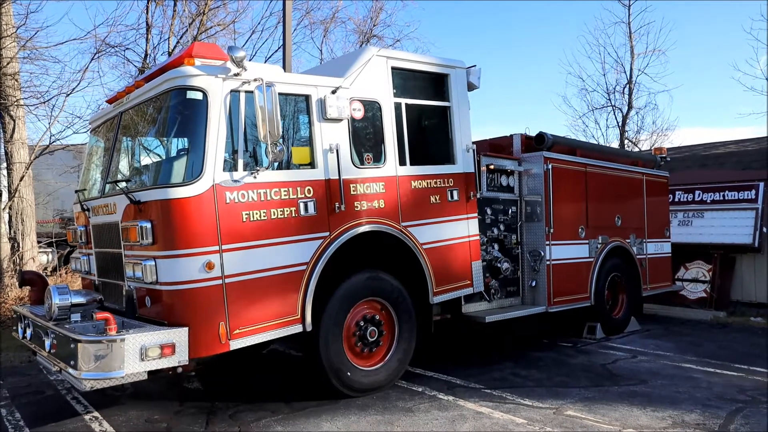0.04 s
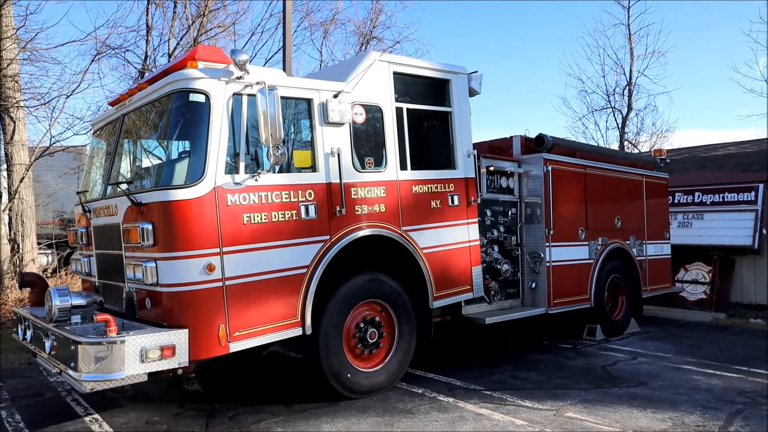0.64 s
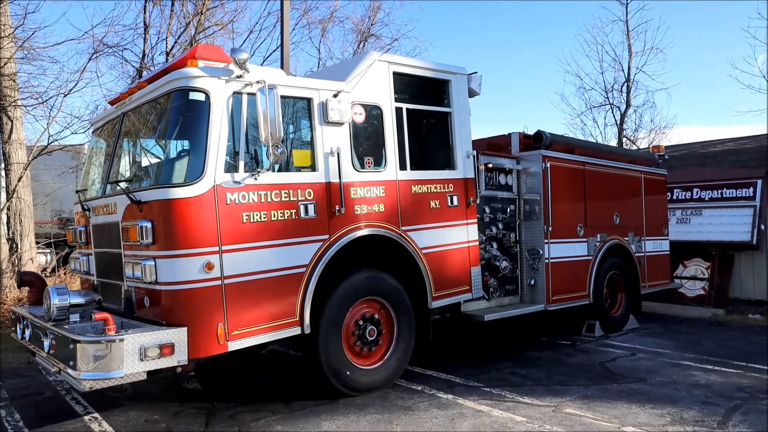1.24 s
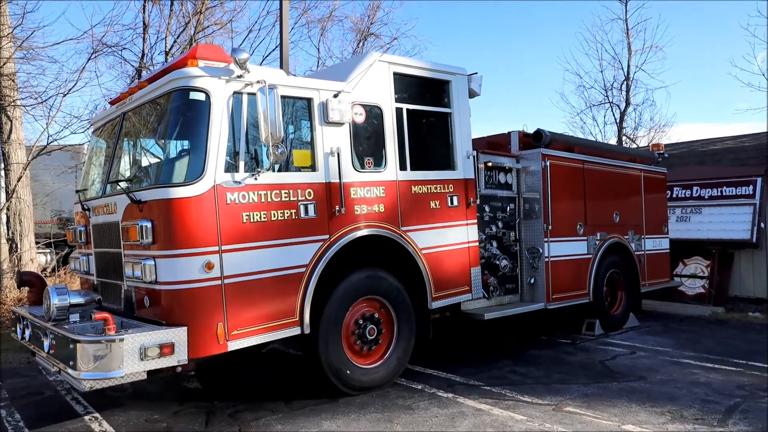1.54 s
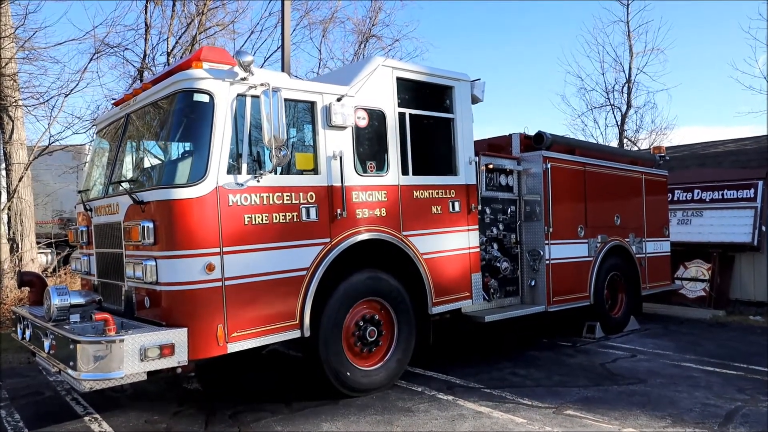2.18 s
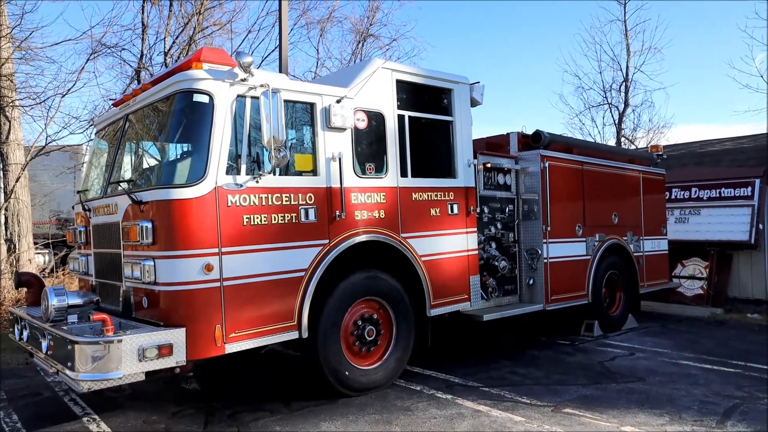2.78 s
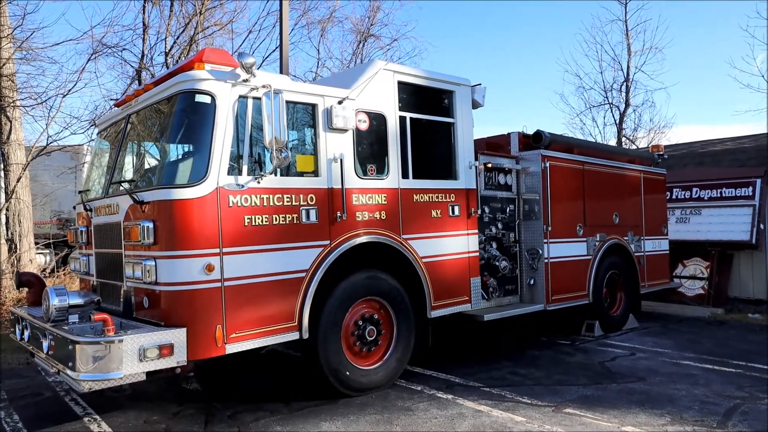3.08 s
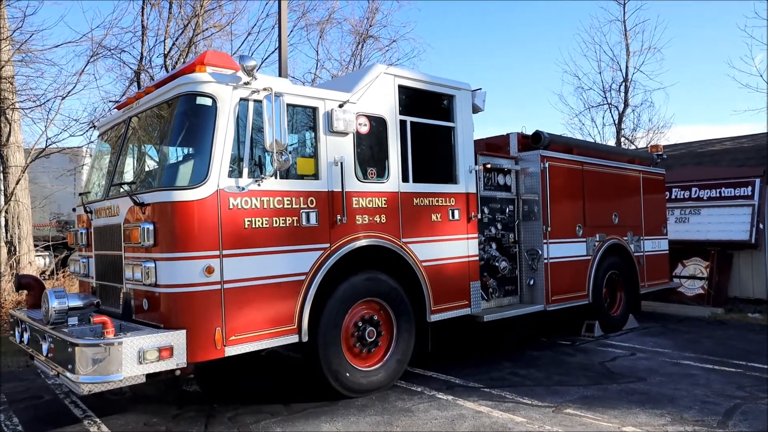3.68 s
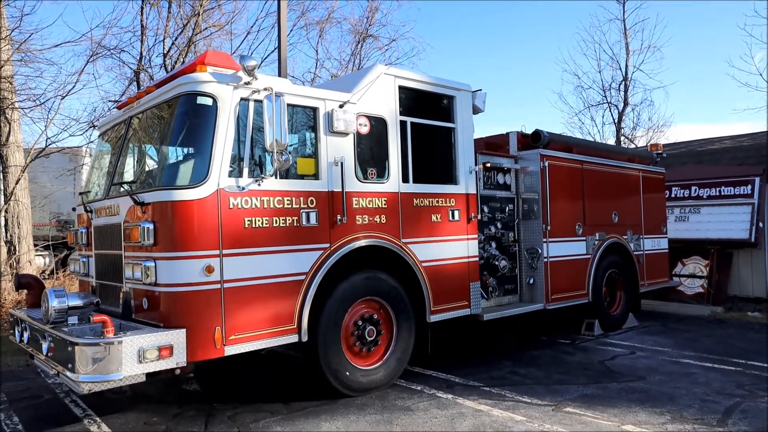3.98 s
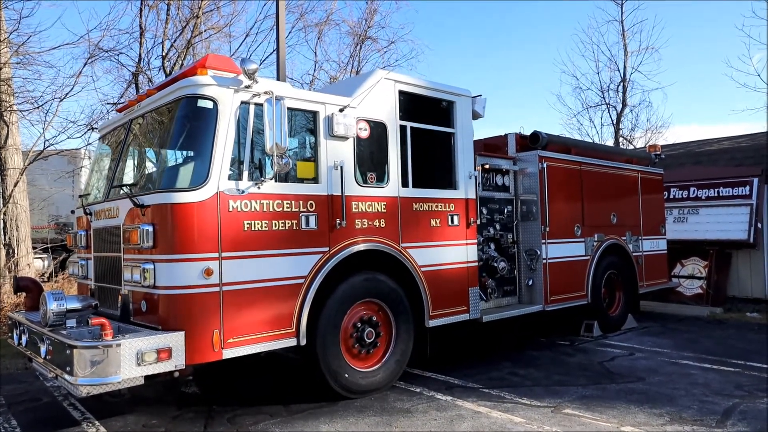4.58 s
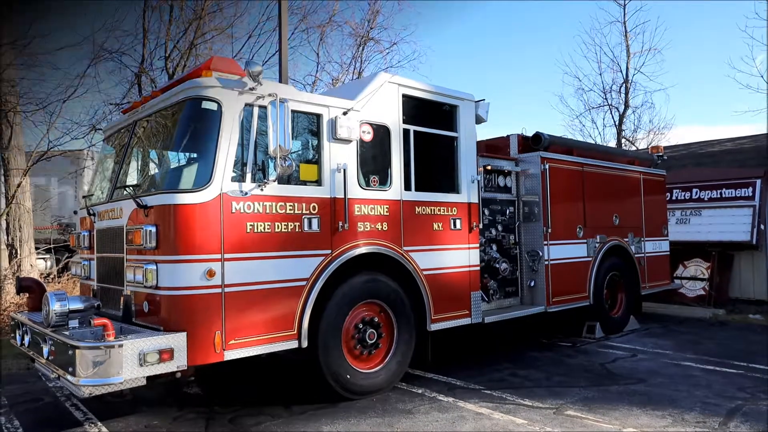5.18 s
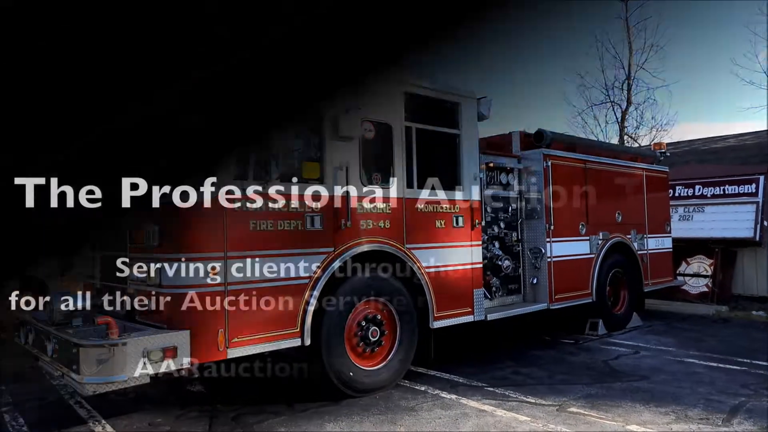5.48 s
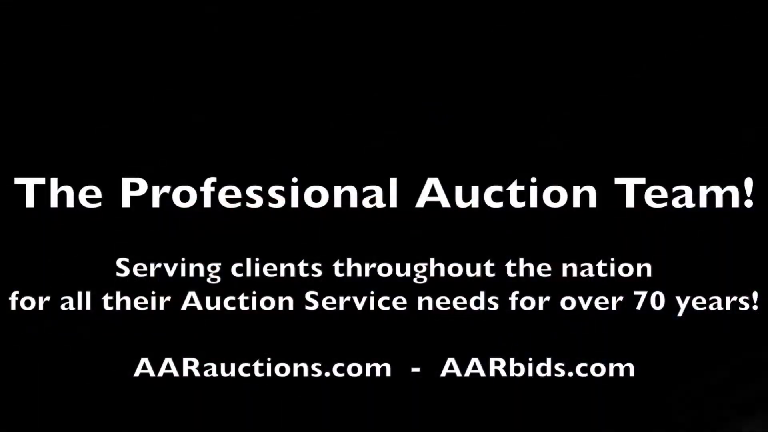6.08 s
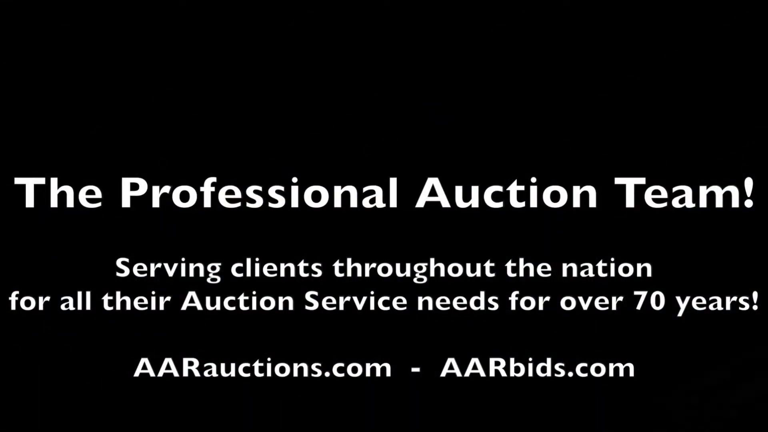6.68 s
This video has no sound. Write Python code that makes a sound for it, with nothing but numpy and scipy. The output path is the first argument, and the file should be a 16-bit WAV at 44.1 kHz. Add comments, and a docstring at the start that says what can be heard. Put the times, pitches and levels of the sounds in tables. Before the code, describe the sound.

A parked fire truck idles nearby, its diesel engine knocking and rattling evenly, with puffs of wind on the microphone.

```python
"""In a parking lot, a fire engine's six-cylinder diesel idles a few metres away.
Each firing and its piston strikes knock the engine block and body panels. The valve gear
clatters, the exhaust drones, and a faint whistle climbs over a hiss of air.
Gusts buffet the microphone's openings and a few small metal parts tick, until the sound
is switched off."""
import sys
import numpy as np
from scipy import signal
from scipy.fft import rfft, irfft, next_fast_len
from scipy.io import wavfile
from scipy.ndimage import map_coordinates

SR = 44100
rng = np.random.default_rng(int(sys.argv[2]) if len(sys.argv) > 2 else 0)


def output_pcm(signal):
    """Save a mono or channel-first signal as 16-bit PCM at the path in sys.argv[1].

    Samples are clipped to [-1, 1] before scaling.
    """
    pcm = np.clip(np.atleast_2d(signal).T, -1, 1) * 32767
    wavfile.write(sys.argv[1], SR, np.round(pcm).astype(np.int16))


N = 301423

# strength of each cylinder, in firing order: (level [dB])
CYLINDER_DB = [-.2, 0, .4, 0, -.4, .3]
# how loud the engine sounds, dipping briefly after the wind slap near 4 s:
# (time [s], knock [dB], clatter [dB])
ENGINE_LEVELS = [(0, -18.5, -33), (1.1, -19.5, -34), (3.85, -19.5, -34), (4.1, -20.5, -35.5),
                 (4.9, -19.5, -34.5), (6.1, -19, -33)]
# each piston strikes three times after it fires: (delay [s], level [dB])
PISTON_STRIKES = [(.0075, -1), (.0135, 0), (.02, -3)]
# knocks that stand out: (time [s], level over an ordinary strike [dB])
HARD_KNOCKS = [(.113, 11.5), (.334, 7), (.565, 10.5), (1.419, 8.5), (1.609, 12), (1.763, 8), (1.799, 8),
               (2.371, 10.5), (4.848, 5), (5.545, 5)]
# how much of the rattle repeats every engine cycle: (frequency [Hz], share [0-1])
REPEATING_SHARE = [(100, .3), (300, .35), (550, .7), (850, .8), (1200, .68), (1700, .48), (2500, .22),
                   (5000, .08)]
# the tone of each source, from low to high: (frequency [Hz], relative level [dB])
BLOCK_SPECTRUM = [(300, -46), (520, -11.5), (640, -7), (730, -3), (1150, -0.5), (1480, -5.5), (1750, -5.5),
                  (2100, -7.5), (2600, -11.5), (3000, -22.5), (4000, -49), (6000, -58)]
VALVE_SPECTRUM = [(1500, -35.5), (2600, -0.5), (3300, 3.5), (4100, 2), (4500, -3), (5100, -7.5),
                  (5600, -4.5), (6300, -6.5), (7200, -20.5), (9000, -22), (12000, -31), (16000, -35)]
EXHAUST_SPECTRUM = [(25, -34), (50, -28), (80, -14), (120, -5), (170, -.5), (260, 0), (340, -3), (450, -1),
                    (570, 1), (700, -8), (1000, -30)]
BUFFET_SPECTRUM = [(20, -39), (45, -38), (70, -27), (100, -18), (150, -1), (250, 5), (400, 1.5),
                   (600, -2.5), (1000, -27), (2500, -56)]
RUMBLE_SPECTRUM = [(20, -19.5), (45, -21), (70, -4.5), (100, 0), (140, 8.5), (250, -37.5)]
HISS_SPECTRUM = [(2000, -8), (6000, 8.5), (9000, -1.5), (12000, -1), (15500, -8.5)]
# steady exhaust tones: (pitch [times the firing rate], level [dB])
EXHAUST_TONES = [(2, -66.5), (3, -55), (4, -51), (6, -54), (12, -49), (18, -49)]
# ringing panels and covers, and the dips between them: (pitch [Hz], width [Hz], boost [dB])
PANEL_RINGS = [(447, 22, 3), (510, 25, -2), (566, 20, 4), (642, 40, -3.5), (706, 25, 3), (778, 28, 6),
               (828, 14, 3), (855, 20, 5), (907, 24, -4.5), (953, 20, 5), (1003, 32, 4.5), (1038, 22, 2.5),
               (1118, 20, 2), (1174, 36, 4.5), (1262, 28, -3), (1296, 25, 2), (1366, 22, 5.5),
               (1448, 16, 2), (1602, 20, 2.5), (1640, 30, 3), (1762, 30, 2), (2130, 40, -2.5),
               (2390, 40, 3.5), (2800, 50, 2), (3230, 90, 2.5), (5940, 90, 5)]
# panels whose ring comes and goes: (pitch [Hz], width [Hz])
LOOSE_PANELS = [(778, 35), (953, 30), (1005, 50), (1118, 30), (1180, 55), (1366, 35)]
# how freely they ring: (time [s], then one boost for each of the six panels [dB])
LOOSE_PANEL_BOOSTS = [(0, -1, .8, -2, 1.5, -1.3, 2), (.6, -1, 1.3, -1.7, 2, -1.3, 1.5),
                      (1.3, -1, 1.3, -1, .7, -2.5, 1), (1.8, .3, .2, .3, -.5, -.5, 2.2),
                      (2.8, .5, -2, -1, -1, 1, -2), (3.7, .5, -2, .6, -1, 1.5, -2),
                      (4.3, -.5, -2.5, .7, -2, 1, -3), (5.2, -.3, -2.5, .7, -1.5, -1.5, -2.5),
                      (6, .5, -1.3, 1.5, -1.5, 0, -2)]
# how alike the engine sounds at the two ears: (frequency [Hz], likeness [0-1])
ENGINE_LIKENESS = [(60, .93), (130, .92), (290, .9), (640, .96), (1250, .95), (2300, 0.62), (3100, 0.45),
                   (6000, 0.3), (9000, 0.35), (15000, .2)]
# how much louder it is on the left: (frequency [Hz], left minus right [dB])
ENGINE_BALANCE = [(60, -1.5), (110, -2), (200, -3.5), (380, 1.5), (700, -0.5), (1290, -2), (2380, -3.5),
                  (4400, 1), (8120, 2.0), (15000, 3.0)]
# how far its waves are ahead on the left: (frequency [Hz], phase lead [radians])
ENGINE_LEAD = [(0, 2.5), (260, -0.16), (950, 0.0), (2410, 0.07), (3010, 2), (3960, 2.0), (5170, 4),
               (6890, 3.5), (8960, 1), (9300, 3), (10500, 4), (12400, 5), (13400, 3.5), (15600, 4)]
# a light breeze with three lulls: (time [s], level [dB])
BREEZE_LEVELS = [(0, -31.5), (2.1, -30), (2.45, -39.5), (2.8, -29), (4.15, -39), (4.4, -30), (5.6, -32),
                 (5.9, -35), (6.15, -28)]
# gusts: (start [s], hold [s], buffet [dB], rumble [dB], left minus right [dB])
GUSTS = [(0.028, 0.079, -24, -36.5, 0), (0.22, 0.085, -32, -35.5, 4), (0.588, 0.19, -28, -34, 8),
         (1.24, 0.099, -26, -56, 3.5), (1.459, 0.066, -29, -60.5, 5), (1.71, 0.15, -31, -52, 4),
         (2.07, 0.068, -29, -42, 4.5), (2.538, 0.13, -19, -46, 2.5), (2.722, 0.13, -21, -37, 1),
         (2.925, 0.12, -27.5, -55.5, 1.5), (3.202, 0.17, -23, -47, 2), (3.46, 0.069, -25.5, -46, 4),
         (3.816, 0.14, -24, -42, 7), (4.46, 0.091, -30, -42, 7), (4.855, 0.17, -28.5, -62, 1.5),
         (5.27, .14, -34, -40.5, -3.5), (5.672, 0.098, -27, -42.5, 3), (6.018, 0.096, -29.5, -49, 8)]
# slaps of wind: (start [s], level [dB], left minus right [dB], low edge [Hz], high edge [Hz])
WIND_SLAPS = [(0.682, -17, 10.5, 110, 480), (0.919, -18.5, 7, 160, 450), (1.27, -22, 6, 220, 520),
              (2.565, -20, 9, 151, 450), (2.62, -20.5, 5.5, 170, 500), (2.652, -22, 0.5, 159, 418),
              (2.745, -23, 4, 90, 260), (2.79, -22, 8, 280.5, 600), (3.308, -20.5, -0.5, 130, 290),
              (3.986, -12.5, 8, 234, 580), (4.505, -23.5, 5, 100, 220), (4.798, -22, 5.5, 240, 620),
              (5.043, -24, 2, 273, 460), (5.72, -25, 5, 90, 200), (5.758, -17.5, 7, 120, 400)]
# how alike the wind is at the two openings: (frequency [Hz], likeness [0-1])
WIND_LIKENESS = [(50, .85), (160, .92), (400, .88), (700, .6)]
# how far the wind is ahead on the left: (frequency [Hz], phase lead [radians])
WIND_LEAD = [(40, .1), (90, .45), (160, .9), (260, 1.2), (400, 1.35), (700, 1.3)]
# small metal ticks: (start [s], level [dB], pitch [Hz], width [Hz], time to fade by 60 dB [s])
METAL_TICKS = [(.1765, -36.5, 5520, 600, .05), (.49, -36.5, 5550, 600, .05), (2.338, -37, 5550, 600, .06),
               (2.395, -34, 5900, 450, .06), (3.32, -38, 5890, 400, .06), (3.41, -36, 6000, 600, .07),
               (3.918, -36, 5940, 450, .08), (3.983, -35.5, 5800, 550, .07), (4.3, -36.5, 5970, 450, .07),
               (4.818, -46.5, 10320, 200, .14), (4.812, -45, 10500, 4400, .12),
               (5.19, -35.5, 5500, 1500, .06), (5.764, -37, 5600, 2000, .19),
               (5.792, -19.5, 4750, 2400, .011), (5.796, -37, 5900, 600, .07),
               (5.826, -35, 5200, 1700, .08)]
# swells of the whistle: (time [s], boost [dB])
WHISTLE_SWELLS = [(.62, 12), (4.52, 9)]

FIRING_HZ = 31.502  # firings per second, all cylinders together
TIME = np.arange(N) / SR  # seconds


def engine():
    """Knock, valve clatter and exhaust all keep time with the turning crankshaft."""
    firings = crank()
    knock_gain, clatter_gain = amp(curves(ENGINE_LEVELS))
    return knock_gain * knock(firings) + clatter_gain * valve_clatter(firings) + exhaust(firings)


def crank(hunt=.0061, flutter=.00086):
    """A running count of firings; the governor, which holds the speed, wavers very slightly."""
    return .7 + FIRING_HZ * TIME + hunt * wobble(2.5) + flutter * wobble(14)


def knock(firings, strike_share=.08):
    """Burning fuel and striking pistons shake the block and its panels."""
    bangs = pulses(firings, rise_s=.0062, decay_s=.02, floor=.39, scatter_db=.6)
    combustion = unit(rattle(firings) * bangs)
    strikes = unit(bending_waves(piston_strikes(firings)))
    force = np.sqrt(1 - strike_share) * combustion + np.sqrt(strike_share) * strikes
    return loose_panels(radiated(force, BLOCK_SPECTRUM))


def piston_strikes(firings, offset_s=.0012, jitter_s=.00007, scatter_db=2):
    """Sharp piston strikes, each cylinder with its own timing, and a few harder knocks."""
    number = np.arange(1, int(firings[-1]))
    delay, db = np.transpose(PISTON_STRIKES)
    offsets = offset_s * rng.standard_normal((len(CYLINDER_DB), len(delay)))
    jitter, scatter = rng.standard_normal((2, len(number), len(delay)))
    fired_s = np.interp(number, firings, TIME)
    strike_s = fired_s[:, None] + delay + offsets[number % len(CYLINDER_DB)] + jitter_s * jitter
    hard_s, hard_db = np.transpose(HARD_KNOCKS)
    samples = np.round(np.append(strike_s, hard_s) * SR).astype(int)
    sizes = amp(np.append(db + scatter_db * scatter, hard_db))
    random_sizes = sizes * rng.standard_normal(len(sizes))
    return np.array([np.bincount(samples, weights, N)[:N] for weights in (sizes, random_sizes)])


def bending_waves(x, travel_s=.005, at_hz=1000):
    """High notes cross the block sooner than low ones, so a strike becomes a short falling chirp."""
    return filtered(x, lambda hz: np.exp(-2j * np.pi * travel_s * (2 * np.sqrt(at_hz * hz) - hz)))


def loose_panels(x):
    """The loudest panels ring now more, now less freely."""
    out = x
    for (pitch, width), db in zip(LOOSE_PANELS, curves(LOOSE_PANEL_BOOSTS)):
        ring = filtered(x, lambda hz: 1j * hz * width / (pitch ** 2 - hz ** 2 + 1j * hz * width))
        out = out + (amp(db) - 1) * ring
    return out


def valve_clatter(firings):
    """The valve gear taps, a little louder once per turn of the crank (three firings)."""
    turn_db = .8 * np.cos(2 * np.pi * (firings - 2.4) / 3)
    taps = amp(turn_db) * pulses(firings, rise_s=.005, decay_s=.02, floor=.48, scatter_db=1.1)
    return radiated(rattle(firings) * taps, VALVE_SPECTRUM)


def exhaust(firings):
    """One uneven puff per firing, over a drone at multiples of the firing rate."""
    puffs = pulses(firings, rise_s=.008, decay_s=.028, floor=.32, scatter_db=4)
    chugging = amp(-33.5) * radiated(rattle(firings) * puffs, EXHAUST_SPECTRUM)
    drone = sum(amp(db) * tone(multiple * firings + rng.random()) for multiple, db in EXHAUST_TONES)
    return chugging + drone


def pulses(firings, rise_s, decay_s, floor, scatter_db):
    """A loudness curve: each firing swells and dies away over a steady floor."""
    index = firings.astype(int)
    count = index.max() + 2
    size = amp(np.resize(CYLINDER_DB, count) + scatter_db * rng.standard_normal(count))
    age = firings % 1 / FIRING_HZ
    shape = lambda t: (1 - np.exp(-(t / rise_s) ** 2)) * np.exp(-t / decay_s)
    latest = size[index] * shape(age)
    previous = size[index - 1] * shape(age + 1 / FIRING_HZ)
    return unit(np.sqrt(latest ** 2 + previous ** 2 + floor ** 2))


def rattle(firings, reshape_rad_per_s=.35, drift_rad=.18):
    """Noise of impacts: some come back every two turns of the crank, others are new each time."""
    per_firing = int(SR / FIRING_HZ)
    patterns = rng.standard_normal((2, 2, per_firing * len(CYLINDER_DB)))
    looped = lambda pattern: map_coordinates(pattern, [firings * per_firing], mode="grid-wrap")
    first, second = [np.array([looped(a), looped(b)]) for a, b in patterns]
    # slack in the moving parts slowly reshapes the repeating pattern
    blend = reshape_rad_per_s * TIME + drift_rad * wobble(2.02)
    repeating = np.cos(blend) * first + np.sin(blend) * second
    share = lambda hz: along(REPEATING_SHARE, hz)
    fresh = filtered(noise_pair(), lambda hz: np.sqrt(1 - share(hz)))
    return filtered(repeating, lambda hz: np.sqrt(share(hz))) + fresh


def radiated(pair, spectrum):
    """Two unrelated signals take on a source's tone, ring the panels and reach both ears."""
    def response(hz):
        boost_db = sum(db / (1 + (2 * (hz - pitch) / width) ** 2) for pitch, width, db in PANEL_RINGS)
        ears = panned(along(ENGINE_BALANCE, hz)) * left_ahead(ENGINE_LEAD, hz)
        return ring_after_strike(amp(along(spectrum, hz) + boost_db)) * ears
    return unit(filtered(spread(pair, ENGINE_LIKENESS), response))


def wind(sway_db=1.5, lump_db=2.1):
    """A breeze and its gusts hit the microphone's openings in lumps, over a deep rumble."""
    breeze = amp(curves(BREEZE_LEVELS)[0] + sway_db * wobble(13))
    buffet_power = (panned(left_db=2.5)[:, None] * breeze) ** 2
    rumble_power = (amp(-19.5) * breeze) ** 2
    for start, hold, buffet_db, rumble_db, left_db in GUSTS:
        flow = gust(start, hold)
        buffet_power += (amp(buffet_db) * panned(left_db)[:, None] * flow) ** 2
        rumble_power += (amp(rumble_db) * flow) ** 2
    lumps = amp(lump_db * wobble(70))
    buffet = coloured(lumps * spread(noise_pair(), WIND_LIKENESS), BUFFET_SPECTRUM)
    rumble = coloured(spread(noise_pair(), WIND_LIKENESS), RUMBLE_SPECTRUM)
    return np.sqrt(buffet_power) * buffet + np.sqrt(rumble_power) * rumble


def gust(start, hold, rise_s=.017, decay_s=.027):
    """A gust rises quickly, holds and dies away."""
    age = TIME - start
    return np.clip(age / rise_s, 0, 1) * np.exp(-np.maximum(age - hold, 0) / decay_s)


def wind_slaps(rise_s=.0048):
    """The strongest swirls of air hit the openings as short puffs."""
    puff = lambda age: age / rise_s * np.exp(1 - age / rise_s)
    return sum(amp(db) * panned(left_db)[:, None] * burst(start, puff, low_hz, high_hz, likeness=.88)
               for start, db, left_db, low_hz, high_hz in WIND_SLAPS)


def from_the_left(wind_pair):
    """The wind comes from the left and reaches that opening first."""
    return filtered(wind_pair, lambda hz: left_ahead(WIND_LEAD, hz))


def metal_ticks():
    """Small metal parts tap and ring briefly, each around one pitch."""
    out = np.zeros((2, N))
    for start, db, hz, width, fade_s in METAL_TICKS:
        fade = lambda age: amp(-60 * age / fade_s)
        out += amp(db) * burst(start, fade, hz - width / 2, hz + width / 2, likeness=.3)
    return out


def air_hiss():
    """The smooth hiss of moving air."""
    return amp(-47) * radiated(noise_pair(), HISS_SPECTRUM)


def whistle(start_hz=8790, climb_hz_per_s=130, top_hz=9355, swell_s=.2, fade_at_s=5, fade_s=.2):
    """A thin, fluttering whistle creeps upward, swells twice and fades out."""
    hz = np.minimum(start_hz + climb_hz_per_s * TIME, top_hz)
    db = -69 + sum(boost * np.exp(-((TIME - s) / swell_s) ** 2) for s, boost in WHISTLE_SWELLS)
    fade = np.clip((fade_at_s - TIME) / fade_s + 1, 0, 1)
    flutter_db = 4 * wobble(45) + 1.5 * wobble(6)
    flutter_hz = 30 * wobble(180)
    return amp(db + flutter_db) * fade * tone(np.cumsum(hz + flutter_hz) / SR)


def burst(start, shape, low_hz, high_hz, likeness):
    """A short stereo burst of noise in one band; shape gives its loudness at each age."""
    envelope = shape(np.arange(SR // 4) / SR)
    mid, side = rng.standard_normal((2, len(envelope)))
    pair = np.sqrt(1 + likeness) * mid + np.sqrt(1 - likeness) * np.array([side, -side])
    band = signal.butter(3, [low_hz, high_hz], "bandpass", fs=SR, output="sos")
    sound = signal.sosfilt(band, pair * envelope)
    sound *= np.linalg.norm(envelope) / np.linalg.norm(sound, axis=1, keepdims=True)
    return np.pad(sound, ((0, 0), (round(start * SR), N)))[:, :N]


def spread(pair, likeness):
    """Mix two unrelated signals into left and right, as alike as the table says."""
    angle = lambda hz: np.arccos(along(likeness, hz)) / 2
    mid, side = filtered(pair, lambda hz: np.array([np.cos(angle(hz)), np.sin(angle(hz))]))
    return np.array([mid + side, mid - side])


def panned(left_db):
    """Left and right gains, left_db apart, that keep the total power the same."""
    gains = amp([left_db / 2, -left_db / 2])
    return gains / np.sqrt(np.mean(gains ** 2, axis=0))


def left_ahead(lead, hz):
    """A filter that shifts the left wave ahead of the right by the table's phase."""
    return np.exp(.5j * np.outer([1, -1], along(lead, hz)))


def ring_after_strike(gain):
    """A filter with this gain that rings only after it is struck (minimum phase)."""
    cepstrum = irfft(np.log(gain))
    half = len(cepstrum) // 2
    return np.exp(rfft(np.r_[cepstrum[0], 2 * cepstrum[1:half]], len(cepstrum)))


def coloured(x, spectrum):
    """Shape x with a spectrum table, then scale it to level 1."""
    return unit(filtered(x, lambda hz: amp(along(spectrum, hz))))


def filtered(x, response):
    """Multiply each frequency in x by response(hz)."""
    size = 2 * next_fast_len((N + SR) // 2)
    return irfft(rfft(x, size) * response(np.fft.rfftfreq(size, 1 / SR)), size)[..., :N]


def along(points, hz):
    """Read between the rows of a (frequency, value) table on a log frequency scale."""
    freqs, values = np.transpose(points)
    return np.interp(np.log(hz + 1), np.log(freqs + 1), values)


def curves(rows):
    """Turn each column after the time into one value per sample."""
    times, *columns = np.transpose(rows)
    return [np.interp(TIME, times, column) for column in columns]


def wobble(rate):
    """A smooth curve through this many random points a second."""
    return map_coordinates(rng.standard_normal(int(N * rate / SR) + 4), [TIME * rate])


def noise_pair():
    """Two unrelated white noises."""
    return rng.standard_normal((2, N))


def tone(cycles):
    """A sine wave of average (rms) level 1, from a running count of cycles."""
    return np.sqrt(2) * np.sin(2 * np.pi * cycles)


def unit(x):
    """Scale to an average (rms) level of 1."""
    return x / np.sqrt(np.mean(x ** 2) + 1e-20)


def amp(db):
    """Turn decibels into a gain."""
    return 10 ** (np.asarray(db) / 20)


def scene():
    """The idling truck in a light wind."""
    return engine() + whistle() + air_hiss() + from_the_left(wind() + wind_slaps()) + metal_ticks()


def record(dry):
    """The sound is switched off abruptly, and the very highest treble is cut away."""
    end_s, top_hz = 6.161, 15850
    switched_on = np.clip((end_s - TIME) / .002, 0, 1)
    return filtered(dry * switched_on, lambda hz: np.clip((top_hz - hz) / 100, 0, 1))


dry = scene()
out = record(dry)
output_pcm(out)
```